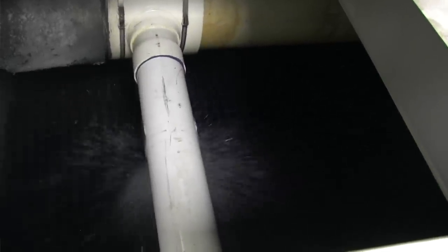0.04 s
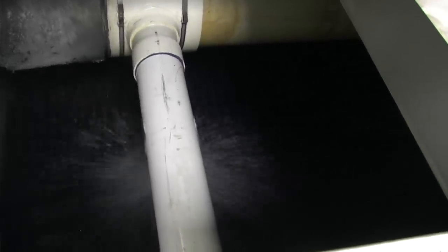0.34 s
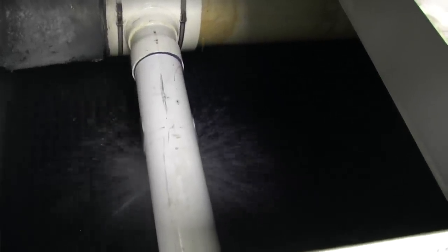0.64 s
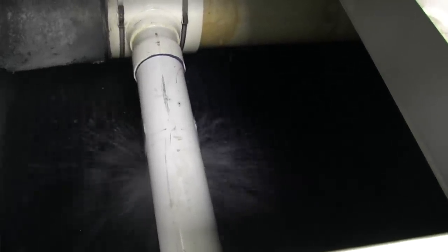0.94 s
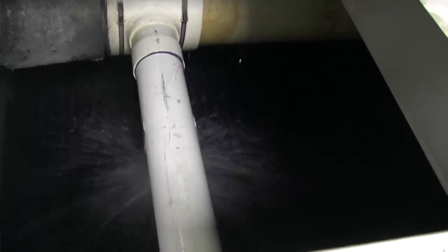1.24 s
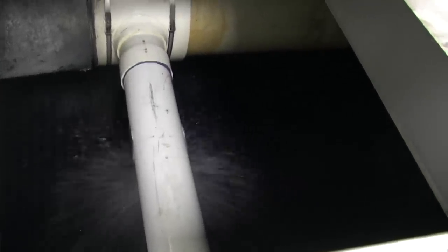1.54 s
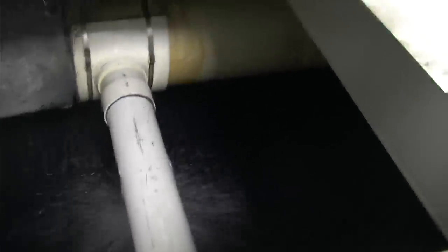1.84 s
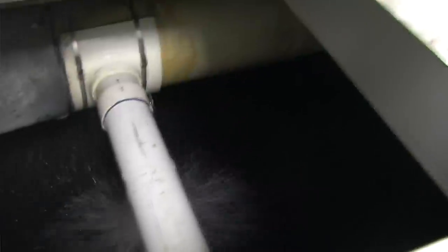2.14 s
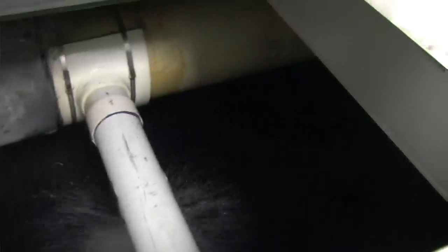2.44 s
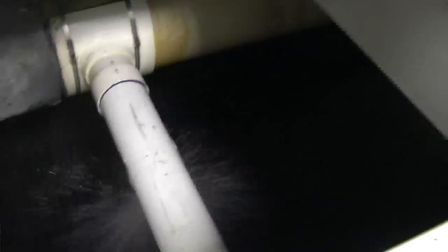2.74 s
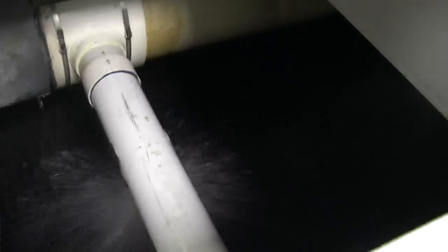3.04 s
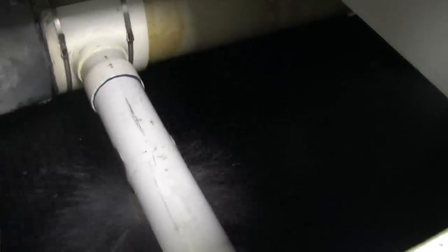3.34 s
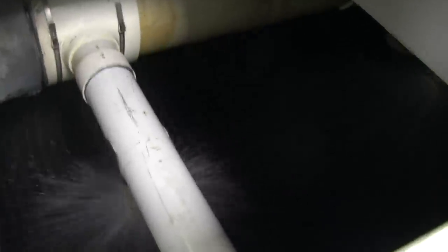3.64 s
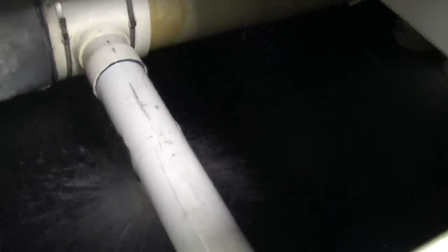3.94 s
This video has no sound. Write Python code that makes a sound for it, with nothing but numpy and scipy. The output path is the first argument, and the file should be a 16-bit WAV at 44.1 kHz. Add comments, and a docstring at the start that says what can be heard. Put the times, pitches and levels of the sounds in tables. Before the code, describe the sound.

Water sprays and falls in a loud, steady rush for all four seconds, a low roar topped by hiss and fine pattering drops. Air buffets the microphone in short, low rumbles, with a sharp thump around 0.3 seconds and milder ones until 1.5. The gusts return after 2.2 seconds and hit hardest from about 3.2 to 3.9. Machinery hums faintly underneath throughout.

```python
"""Falling water roars inside a cooling tower, where a nozzle sprays a dense sheet of drops onto the fill
(the packing that breaks up the water). The draught buffets the microphone in short, rumbling gusts that
push left and right in opposite directions. A machine hums faintly behind it all. An automatic gain
control turns the sound down on the strongest gusts and creeps back up."""
import sys
import numpy as np
from scipy import signal
from scipy.fft import rfft, irfft, next_fast_len
from scipy.io import wavfile
from scipy.ndimage import uniform_filter1d, map_coordinates

SR = 44100
rng = np.random.default_rng(int(sys.argv[2]) if len(sys.argv) > 2 else 0)


def store_wav(level_fs):
    """Save 16-bit WAV to argv[1]."""
    pcm = np.round(np.clip(np.atleast_2d(level_fs), -1, 1) * 32767)
    wavfile.write(sys.argv[1], SR, pcm.T.astype(np.int16))


N = 176400


def water():
    """Falling water roars in the tower's shell; the spray adds a fluttering hiss and ticking drops."""
    # how loud the water is over time: t/s, level/dB
    loudness = [(0, -15), (.1, -16), (.15, -15), (.21, -14.5), (.4, -15.5), (.85, -15.5), (1.3, -15),
                (1.65, -14.5), (2.2, -15.5), (2.9, -15), (3.35, -16.5), (3.7, -15), (4, -16.5)]
    # tone of the roar: f/Hz, relative level/dB
    roar_tone = [(25, -37), (45, -22), (70, -9.5), (105, -2), (150, 0.5), (178, 4.5), (245, -.5), (400, 1),
                 (720, 0), (1150, -5), (2000, -21.5), (5000, -45)]
    # tone of the hiss: f/Hz, relative level/dB
    hiss_tone = [(300, -21.5), (800, -10), (1200, -5.5), (1550, -3), (1900, -1.06), (2200, 0), (2750, -3),
                 (3500, -2.5), (4800, -6.5), (6900, -8.5), (7900, -6.5), (9600, -9.5), (10400, -8.5),
                 (13400, -11.5), (15000, -17)]
    roar_db, hiss_db, drops_db = -7, -0.6, -11.5  # compared with the water's level
    level_db = np.interp(np.arange(N) / SR, *np.transpose(loudness))
    roar = amp(roar_db) * rush(roar_tone, patchy_db=0.65)
    spray = amp(hiss_db) * rush(hiss_tone, patchy_db=0.52) + amp(drops_db) * drops()
    flutter_db = .15 * wobble(11) + 0.19 * wobble(70)
    return amp(level_db) * (roar + amp(flutter_db) * spray)


def rush(tone, patchy_db):
    """Countless drops blur into noise, with slightly louder and softer patches in time and pitch."""
    noise = signal.stft(rng.standard_normal((2, N)), nperseg=512)[2]
    patches = uniform_filter1d(rng.standard_normal(noise.shape[1:]), size=7, axis=0)  # smooth in pitch
    patches = uniform_filter1d(patches, size=10, axis=1)  # and in time
    pair = signal.istft(noise * amp(patchy_db * unit(patches)), nperseg=512)[1][:, :N]
    return spread(filtered(pair, lambda hz: amp(along(tone, hz))))


def drops(per_second=5000, middle_hz=5900, octaves_each_way=1.28, scatter_db=2):
    """The nearest drops land one by one, each a tiny tick that rings for a few cycles."""
    when, pitch, size, route = rng.random((int(per_second * N / SR), 4)).T
    hz = np.clip(middle_hz * 2 ** (octaves_each_way * (2 * pitch - 1)), SR / 100, SR / 2)
    age = np.arange(SR // 400)  # in samples
    cycles = hz[:, None] * age / SR
    strength = amp(-scatter_db * np.log(size))[:, None]
    fade = 10 ** (-cycles / 2.3)  # down 20 dB in 2.3 cycles
    ticks = strength * np.sin(2 * np.pi * cycles) * fade
    start = (when * N).astype(int) + N * (route < .5)  # in one of two signals laid end to end
    slots = start[:, None] + age
    patter = np.bincount(slots.ravel(), ticks.ravel(), 2 * N)[:2 * N].reshape(2, N)
    return spread(filtered(patter, lambda f: f / (f + hz.min())))  # thin out the bass


def spread(pair):
    """Spreads the water left and right: narrow in the middle pitches, wide in deep bass and treble."""
    # stereo width: f/Hz, side minus mid/dB
    width = [(40, 4), (110, -12.5), (500, -13.5), (900, -9.5), (1800, -10.5), (2700, -8.5), (4000, -6),
             (7500, -4.5), (9500, -3), (12000, -1), (14500, 0)]
    # lean to one side: f/Hz, left minus right/dB
    balance = [(60, 1), (180, 1.5), (550, -1), (1650, -1.0), (4970, -0.5), (15000, 1)]

    def shares(hz):
        angle = np.arctan(amp(along(width, hz)))
        return np.array([np.cos(angle), np.sin(angle)])

    mid, side = filtered(pair, shares)
    left_right = np.array([mid + side, mid - side])
    return unit(filtered(left_right, lambda hz: amp(np.outer([.5, -.5], along(balance, hz)))))


def draught(rise_s=0.0035, fall_s=0.01, mild_db=-24, octaves_per_db=.018, shared_db=-15.5):
    """Each gust hits the microphone with a short, low rumble, nearly opposite in left and right."""
    # gusts of air: start/s, length/s, level/dB
    gusts = [(0, 0.15, -32.5), (.16, .035, -23.5), (.203, 0.0094, -13), (0.266, 0.011, -7.5),
             (0.275, 0.029, -14), (.35, 0.054, -27), (0.441, 0.095, -22.5), (0.605, .018, -22.5),
             (.69, 0.063, -26), (0.771, .09, -25.5), (.99, .05, -26), (1.12, .09, -31.5),
             (1.294, .02, -30.5), (1.44, .023, -28), (2.195, 0.057, -24), (2.49, .11, -25.5),
             (2.61, 0.099, -21), (2.93, 0.051, -22.3), (3.011, 0.017, -21.5), (3.07, 0.092, -19.3),
             (3.221, 0.038, -12.6), (3.359, .018, -25), (3.675, 0.07, -17), (3.734, 0.0079, -6),
             (3.746, 0.048, -17), (3.846, .014, -6.5), (3.921, 0.053, -17.7)]
    # tone of a mild gust: f/Hz, relative level/dB
    mild_tone = [(25, -29), (60, -15), (130, 1), (220, -2), (340, -3.5), (500, -13), (750, -24),
                 (1500, -48), (4000, -80)]
    t, rumble = np.arange(N) / SR, np.zeros((2, N))
    for start, length, db in gusts:
        near = (t > start - .1) & (t < start + length + .1)
        before, after = np.maximum(start - t[near], 0), np.maximum(t[near] - start - length, 0)
        shape = np.exp(-before / rise_s - after / fall_s)
        stretch = 2 ** (octaves_per_db * (db - mild_db))  # stronger gusts are brighter
        tone = amp(along(mild_tone, np.fft.rfftfreq(SR, 1 / SR) / stretch))
        swirls = shape * irfft(tone * rfft(rng.standard_normal((2, SR))))[:, :len(shape)]
        swirls *= np.linalg.norm(shape) / np.linalg.norm(swirls, axis=1, keepdims=True)
        rumble[:, near] += amp(db) * swirls
    opposite, shared = rumble
    return np.array([opposite, -opposite]) + amp(shared_db) * shared


def hum():
    """The machinery hums on a few unsteady notes, each a narrow band of noise."""
    # notes of the hum: f/Hz, half-width/Hz, level/dB
    notes = [(114.6, 4.7, -43), (204.7, 3.4, -39.5), (386.8, 3.3, -37), (409.5, 3, -37)]
    sound = np.zeros(N)
    for hz, half_width, db in notes:
        note = filtered(rng.standard_normal(N), lambda f: 1 / (1 + ((f - hz) / half_width) ** 4))
        sound += amp(db) * unit(note)
    return np.array([sound, sound])


def amp(db):
    """Turns decibels into a number to multiply by."""
    return 10 ** (np.asarray(db) / 20)


def unit(x):
    """Scales a signal to an average (rms) level of 1."""
    return x / np.sqrt(np.mean(x ** 2) + 1e-20)


def along(points, hz):
    """Reads between the rows of a (frequency, value) table, on a log frequency scale."""
    f, values = np.transpose(points)
    return np.interp(np.log(hz + 1), np.log(f + 1), values)


def wobble(rate):
    """A smooth curve through `rate` random points a second."""
    return map_coordinates(rng.standard_normal(int(N * rate / SR) + 4), [np.arange(N) * rate / SR])


def filtered(x, response):
    """Multiplies each frequency in x by response(frequency)."""
    padded = next_fast_len(N + SR // 10)
    return irfft(rfft(x, padded) * response(np.fft.rfftfreq(padded, 1 / SR)), padded)[..., :N]


def scene():
    """Water, hum and gusts together, in stereo."""
    return water() + hum() + draught()


def record(dry):
    """Gain control dips at once and recovers slowly; then peaks are clipped and the top treble is cut."""
    threshold_db, cut_per_db, detect_s, release_s, top_hz = -13, 0.51, 0.015, 0.3, 15150
    power = np.abs(uniform_filter1d(np.mean(dry ** 2, axis=0), int(detect_s * SR)))
    level_db = 10 * np.log10(power + 1e-12)
    cut_db = cut_per_db * np.maximum(level_db - threshold_db, 0)
    fade = np.exp(-np.arange(N) / SR / release_s)
    dip_db = np.maximum.accumulate(cut_db / fade) * fade  # each cut fades until a deeper one takes over
    clipped = np.clip(dry * amp(-dip_db), -1, 1)
    return filtered(clipped, lambda hz: hz < top_hz)


dry = scene()
out = record(dry)
store_wav(out)
```